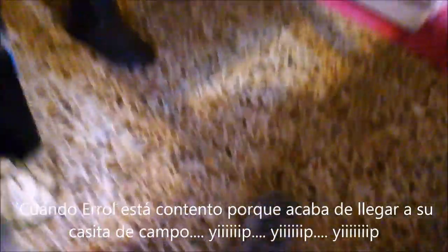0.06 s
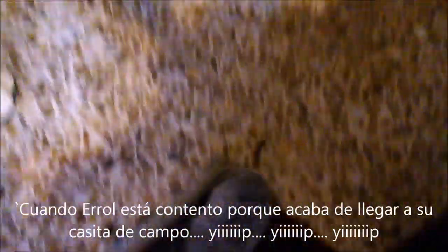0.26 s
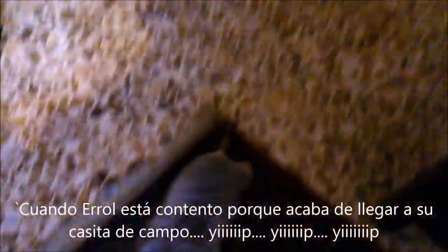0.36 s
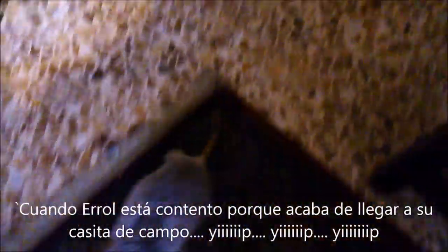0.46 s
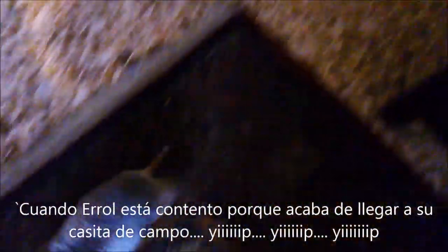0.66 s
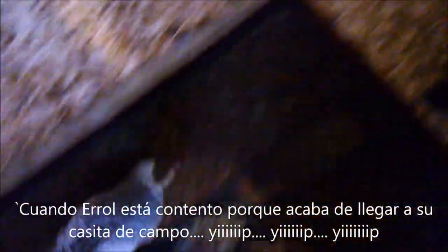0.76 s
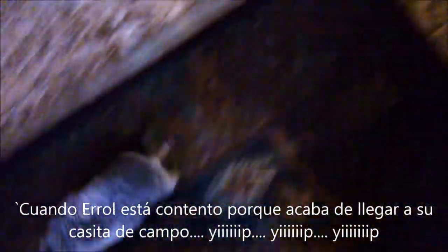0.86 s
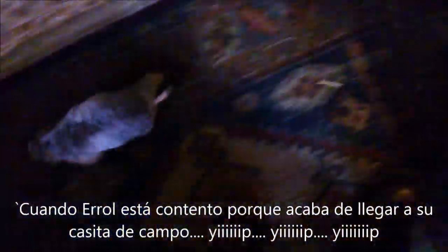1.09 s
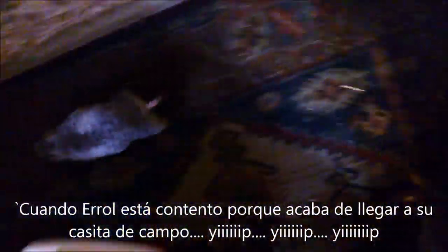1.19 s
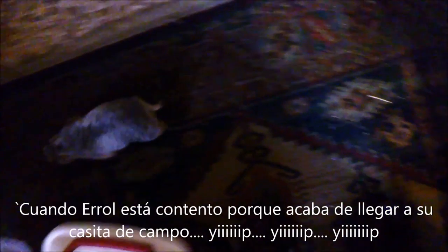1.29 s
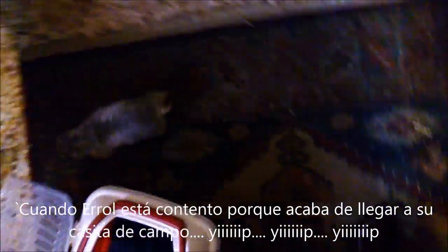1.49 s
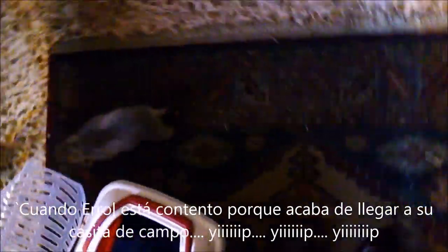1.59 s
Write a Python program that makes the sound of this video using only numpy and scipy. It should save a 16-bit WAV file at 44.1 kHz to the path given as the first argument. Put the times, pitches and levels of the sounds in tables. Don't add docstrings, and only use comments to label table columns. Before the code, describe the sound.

Piercing raspy prairie dog call surges three times indoors, then faint scuffs on a rug

```python
import sys
import numpy as np
from scipy import signal
from scipy.io import wavfile
from scipy.ndimage import uniform_filter1d, minimum_filter1d

SR = 44100
rng = np.random.default_rng(int(sys.argv[2]) if len(sys.argv) > 2 else 0)


def log_audio(samples):
    frames = np.atleast_2d(samples).T
    limited = np.clip(frames, -1, 1)
    pcm = np.round(limited * 32767).astype(np.int16)
    wavfile.write(sys.argv[1], SR, pcm)


def makeup_ratio(level_db):
    decades = np.asarray(level_db, float) / 20
    return 10 ** decades


N = 72765

# (frequency [Hz], level [dB per Hz])
AIR_COLOUR = [(53, -50), (90, -19.5), (381, -16), (600, -16), (1000, -23), (4500, -34.5), (7800, -27.5),
              (11000, -35), (15500, -101)]
# (frequency [Hz], likeness [-1 to 1])
EAR_LIKENESS = [(60, 0.031), (240, 0.77), (950, 0.2), (3770, 0.02), (15000, -0.2)]
# (frequency [Hz], left over right [dB])
EAR_BALANCE = [(60, 4.5), (240, -2.5), (950, -1), (3770, -2), (15000, 4.5)]
# (time [s], level [dB])
RUMBLE_LEVEL = [(0, -54.5), (.2, -54), (1.05, -54.5), (1.22, -55.5), (1.3, -61.5), (1.65, -62.5)]
# (frequency [Hz], level [dB])
RUMBLE_COLOUR = [(15, 6), (30, 1.5), (45, -9.5), (70, -8.5), (120, -20.5), (300, -45)]
# (time [s], pitch [Hz], level [dB])
DRONE_PATH = [(0, 550, -97), (.2, 544.7, -71), (.35, 540, -72), (.5, 550, -75.5), (1.0, 529.2, -73.5),
              (1.1, 560, -60), (1.2, 540, -69.5), (1.27, 591, -69.5), (1.36, 498, -83)]
# (start [s], length [s], level [dB], brightness [dB per octave])
RUG_SCUFFS = [
    (-.03, 0.11, -74, 9.5),
    (0.085, 0.11, -80, 14.5),
    (1.042, 0.2, -78.5, 12.5),
    (1.305, 0.2, -65, 7.5),
    (1.634, 0.13, -66, 8),
    (1.531, 0.081, -81.5, -2.5),
]
# (frequency [Hz], level [dB per Hz])
RUG_COLOUR = [(200, -7), (400, 4), (1200, 1), (2800, -4), (5000, -18.5), (9000, -31), (15000, -52)]
# (time [s], level [dB], pitch [Hz], time to fall 60 dB [s])
KNOCKS = [
    (0.014, -57, 2440, 0.019),
    (.015, -64, 1500, .008),
    (0.335, -48, 234, 0.018),
    (1.529, -59.5, 264, 0.049),
    (1.532, -55.5, 865, 0.034),
    (1.6053, -51.5, 4330, 0.0074),
]
# (frequency [Hz], time to fall 60 dB [s])
ROOM_RING = [(300, 0.24), (1000, 0.34), (2300, 0.3), (4000, 0.28), (8000, 0.23), (14000, 0.17)]
# (time [s], pitch [Hz], effort [dB], roughness [0-1],
# half-pitch share [0-1], brightness [dB per octave], treble left over right [dB])
FIRST_SURGE = [
    (.197, 2430, -41, 0.08, 0, 2, 8),
    (.212, 2515, -33.5, 0.21, 0.13, 5.5, -1),
    (.238, 2360, -32.5, 0.16, 0, 0.5, 3.5),
    (.254, 2300, -40, .75, 0.66, 0.5, 4.5),
    (.275, 2284, -37, .7, 0, 3, 0),
    (.29, 2450, -33, 0.54, 0.3, 2, 2.5),
    (.302, 2830, -32.5, .4, 0.5, 3, 5),
    (.33, 2700, -36.5, 0.54, .1, 3.5, -4.5),
    (.35, 2300, -48.5, 0.72, 0.4, -2, 16.5),
]
SECOND_SURGE = [
    (0.383, 1454, -46, 0.52, 0.11, 1, 0),
    (0.4, 1510, -44.5, 0.55, .02, 1, 0.0046),
    (0.437, 1957, -35.5, 0.24, .02, 1, 0.012),
    (0.467, 2047, -35.5, 0.18, 0.54, 0.78, 0.014),
    (0.491, 1938, -35, 0.23, 0.3, 0.14, 0),
    (0.514, 2136, -35.5, 0.71, 0.44, 0.056, 0.006),
    (0.53, 1808, -34, 0.14, 0.013, 0.26, 0),
    (0.558, 1828, -34, 0.1, 0.027, 0.17, 0.0046),
    (.572, 2016, -33.5, 0.11, 0.043, 0.2, 0),
]
SAGGING_PART = [
    (.588, 1817, -37.5, 0.62, 0.036, 0.31, 0),
    (0.609, 1726, -40, 0.46, 0.025, 1, 0),
    (0.643, 2005, -40.5, 0.23, 0.024, 1, 0),
    (.652, 1899, -43, .25, 0.022, 1, 0),
    (0.672, 1555, -46.5, 0.75, 0.05, 1, 0),
    (0.69, 1869, -40, 0.57, 0.0523, 1, 0.015),
    (0.716, 2114, -38, 0.24, 0.05, 1, 0),
    (.738, 1980, -37, 0.45, 0.061, 0.15, 0),
]
THIRD_SURGE = [
    (.75, 2401, -35, .45, 0.87, -1, -2),
    (0.781, 2675, -34.5, .15, 0.34, -1, -6),
    (0.817, 2397, -36.5, 0.51, .45, -2.5, 1),
    (.84, 2420, -33.5, 0.27, 0.42, -6, -10.5),
    (.866, 2340, -37, 0.21, 0.41, -1.5, 4.5),
    (.89, 2211, -38, 0.61, 0.094, -4, -6),
    (0.909, 2156, -37.5, 0.59, 1, -5, 2.5),
    (0.921, 2316, -32.5, 0.87, 0.37, -7, 0.5),
    (0.951, 2115, -47.5, 0.75, .1, -16.5, -8),
]
# (frequency [Hz], level [dB])
THROAT_COLOUR = [(400, -39.5), (1100, -24), (2300, -7), (3400, -3), (5600, -6.5), (7500, 0), (10000, -4.5),
                 (15000, -20.5)]
# (time [s], boost [dB])
MOUTH_RING = [(.2, 0.5), (.3, -1), (.45, 1.5), (.55, 1), (.65, 5.5), (.74, 5.5), (.78, 7), (.86, -5),
              (.93, -1.5)]
# (frequency [Hz], left over right [dB])
PORT_BALANCE = [(1000, -5), (2500, -3.5), (5000, -3), (7300, -9.5), (8500, 7), (10000, 7.5), (14000, 3)]
# (frequency [Hz], left leads by [radians])
PORT_PHASE = [(1000, -0.89), (2500, -0.93), (5000, -0.96), (7300, -1.68), (10000, -1.53), (14000, -1.6)]


def evened(x):
    return x / np.sqrt(np.mean(x ** 2) + 1e-20)


def read(points, hz):
    f, value = np.transpose(points)
    return np.interp(np.log(hz + 1), np.log(f + 1), value)


def curves(rows, t):
    cols = np.transpose(rows)
    return [np.interp(t, cols[0], c) for c in cols[1:]]


def hiss(gain, size=1024):
    hop = size // 4
    hz = np.fft.rfftfreq(size, 1 / SR)[:, None]
    t = np.arange(N // hop + 5) * hop / SR
    a, b, c, d = rng.standard_normal((len(t), len(hz), 4)).T
    shared, own = a + 1j * b, c + 1j * d
    same = np.clip(read(EAR_LIKENESS, hz), -1, 1)
    side = makeup_ratio(read(EAR_BALANCE, hz) / 2)
    right = (same * shared + np.sqrt(1 - same ** 2) * own) / side
    z = np.array([side * shared, right])
    return signal.istft(z * gain(hz, t), nperseg=size, noverlap=size - hop)[1][:, :N]


def background():
    t = np.arange(N) / SR
    air = makeup_ratio(-68.5) * evened(hiss(lambda hz, s: makeup_ratio(read(AIR_COLOUR, hz))))
    shake = evened(hiss(lambda hz, s: makeup_ratio(read(RUMBLE_COLOUR, hz)), size=4096))
    rumble = makeup_ratio(curves(RUMBLE_LEVEL, t)[0]) * shake
    hum_hz, hum_db, hum_end_s = 300.8, -73, 1.288
    hum = makeup_ratio(hum_db) * np.sin(2 * np.pi * hum_hz * t) * np.clip((hum_end_s - t) / 0.15, 0, 1)
    hz, db = curves(DRONE_PATH, t)
    drone_width_hz = 57
    r = np.exp(-np.pi * drone_width_hz / SR)
    noise = rng.standard_normal(N) + 1j * rng.standard_normal(N)
    fuzz = signal.lfilter([1], np.convolve([1, -r], [1, -r]), noise)
    drone = makeup_ratio(db) * evened((fuzz * np.exp(2j * np.pi * np.cumsum(hz) / SR)).real)
    return air + rumble + (hum + drone) * makeup_ratio(np.array([[-2.], [2.]]))


def scuffs():
    def gain(hz, t):
        flicker = makeup_ratio(2 * rng.standard_normal((len(t), 1)).T)
        power = 0
        for start, long, db, tilt_db in RUG_SCUFFS:
            swell = np.sin(np.pi * np.clip((t - start) / long, 0, 1)) ** 0.68
            power = power + (makeup_ratio(db + tilt_db * np.log2((hz + 1) / 3000)) * swell) ** 2
        shape = makeup_ratio(read(RUG_COLOUR, hz))
        return flicker * np.sqrt(power) * shape / np.sqrt(np.sum(shape ** 2))
    return hiss(gain, size=256) * makeup_ratio(11.5)


def taps():
    out, t = np.zeros(N + 4000), np.arange(4000) / SR
    for s, db, hz, t60 in KNOCKS:
        ring = sum(np.sin(2 * np.pi * hz * k * t) for k in (.93, 1.05))
        rise = np.minimum(t * hz / 1.05, 1)
        out[round(s * SR):][:4000] += ring * rise * makeup_ratio(db - 60 * t / t60)
    return out[:N]


def room(x):
    echoes = np.zeros((2, SR // 2))
    slots = np.arange(130, SR // 2 - 20, 20)
    at = slots + rng.integers(0, 20, (2, len(slots)))
    np.put_along_axis(echoes, at, rng.choice([-1., 1.], at.shape), 1)
    hz, t, z = signal.stft(echoes, SR, nperseg=256)
    tail = signal.istft(z * makeup_ratio(-60 * t / read(ROOM_RING, hz)[:, None]), SR, nperseg=256)[1]
    return signal.fftconvolve(x, tail / np.linalg.norm(tail[0]), axes=1)[:, :N]


def fold_tone(turns, rough, half):
    t = np.arange(N) / SR
    flutter_db, break_up = 2.6, 1.6
    slow_noise = uniform_filter1d(rng.standard_normal((42, N // 64 + 2)), size=3, axis=1)
    flutter = makeup_ratio(flutter_db * evened(slow_noise))
    flutter = [np.interp(t, np.arange(len(row)) * 64 / SR, row) for row in flutter]
    flutter = np.reshape(flutter, (21, 2, N)) ** (1 + break_up * rough)
    hz = curves(FIRST_SURGE + SECOND_SURGE + SAGGING_PART + THIRD_SURGE, t)[0]
    folds = 0
    for k in range(1, 21):
        share = half ** 3 if k % 2 else 1
        wave = np.cos(np.pi * k * (turns + .13 * k))
        folds = folds + flutter[k] * wave * share * (k * hz < SR * .8)
    return folds


def breath_puffs(turns, half, air):
    rasp_hz, grit_db = 3700, -2
    puffs = (.5 + np.exp(-(turns % 1) / 0.26)) * air
    treble = signal.butter(4, rasp_hz, "high", fs=SR, output="sos")
    return signal.sosfilt(treble, puffs) + makeup_ratio(grit_db) * np.sqrt(half) * puffs


def yip():
    rows, t = FIRST_SURGE + SECOND_SURGE + SAGGING_PART + THIRD_SURGE, np.arange(N) / SR
    hz, effort_db, rough, half = curves(rows, t)[:4]
    rough, half = np.clip(rough, 0, 1), np.clip(half, 0, 1)
    slow, fast, *air = rng.standard_normal((4, N))
    air = np.array([air[0], .6 * air[0] + .8 * air[1]])
    slow = evened(uniform_filter1d(uniform_filter1d(slow, size=150), size=150))
    fast = evened(uniform_filter1d(fast, size=40))
    wobble, wander, jitter = 0.006, 0.05, 0.11
    unsteady = (wobble + wander * rough ** 2) * slow + jitter * rough ** 2 * fast
    turns = np.cumsum(hz * (1 + unsteady)) / SR
    tone = np.sqrt(1 - rough ** 2) * evened(fold_tone(turns, rough, half))
    rasp_db = 4
    drive = tone + makeup_ratio(rasp_db) * rough * evened(breath_puffs(turns, half, air))

    f, frame, z = signal.stft(drive, SR, nperseg=256, noverlap=192)
    bright_db, pan_db = curves(rows, frame)[4:]
    f = f[:, None]
    mouth_hz, mouth_width_hz, top_hz = 7680, 400, 8000
    ring_db = curves(MOUTH_RING, frame)[0] * np.exp(-((f - mouth_hz) / mouth_width_hz) ** 2)
    octaves = np.log2(np.maximum(f, 900) / 5000) + np.log2(np.maximum(f / top_hz, 1))
    colour = makeup_ratio(read(THROAT_COLOUR, f) + ring_db + bright_db * octaves)
    colour = colour / np.sqrt(np.mean(colour ** 2, axis=0))
    lean_db = (read(PORT_BALANCE, f) + pan_db * (f > 4200)) / 2
    left = z[0] * colour * makeup_ratio(lean_db) * np.exp(1j * read(PORT_PHASE, f))
    right = z[1] * colour / makeup_ratio(lean_db)
    voice = signal.istft(np.array([left, right]), SR, nperseg=256, noverlap=192)[1][:, :N]
    onset_s, release_s = 0.0013, 0.006
    fade_in = np.clip((t - rows[0][0]) / onset_s + 1, 0, 1)
    fade_out = np.clip((rows[-1][0] - t) / release_s + 1, 0, 1)
    return voice * makeup_ratio(effort_db) * fade_in * fade_out


def cough():
    start_s, level_db, t60_s = .917, -43, 0.11
    thud_db, spit_db = -19, -4.5
    t, air = np.arange(N) / SR - start_s, rng.standard_normal((3, N))

    def band(noise, hz, wide):
        sos = signal.butter(2, [hz / wide, hz * wide], "band", fs=SR, output="sos")
        return evened(signal.sosfilt(sos, noise))

    throat, thud = band(air[0], 1060, 2), band(air[1], 315, 1.3)
    spit = band(air[2], 9200 * 1.3, 1.25) * makeup_ratio(level_db + spit_db) * np.exp(-(t / 0.016) ** 2)
    fall = makeup_ratio(level_db - 60 * np.maximum(t - .008, 0) / t60_s)
    return spit + (throat + makeup_ratio(thud_db) * thud) * np.clip(t / 0.002, 0, 1) * fall


def scene():
    call, knocks = yip() + cough(), taps() * np.ones((2, 1))
    direct_db, call_room_db, knock_room_db = -1, -4, -7
    echo = room(makeup_ratio(call_room_db) * call + makeup_ratio(knock_room_db) * knocks)
    return makeup_ratio(direct_db) * call + knocks + echo + scuffs() + background()


def roll_off(x):
    return signal.sosfilt(signal.butter(12, 15830, fs=SR, output="sos"), x)


def record(dry):
    mask_db, reach_hz, cut_db = -19, 750, -20
    low_hz, high_hz, edge_hz = 2100, 14000, 15650
    hz, t, z = signal.stft(dry, SR, nperseg=1024, noverlap=512)
    power = uniform_filter1d(abs(z) ** 2, size=7, axis=1)
    loud = -minimum_filter1d(-power, size=round(2 * reach_hz / hz[1]), axis=1)
    gone = (power < loud * makeup_ratio(2 * mask_db)) & ((hz > low_hz) & (hz < high_hz))[:, None]
    gone = uniform_filter1d(1. * gone, size=7, axis=1) > .3
    z = z * np.where(gone, makeup_ratio(cut_db), 1) * (hz < edge_hz)[:, None]
    kept = signal.istft(z, SR, nperseg=1024, noverlap=512)[1][:, :N]
    return roll_off(kept)


dry = scene()
out = record(dry)
log_audio(out)
```